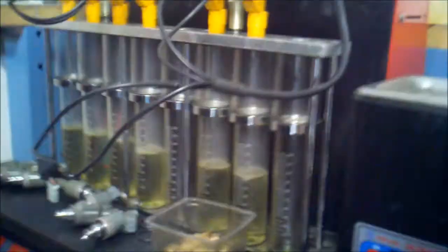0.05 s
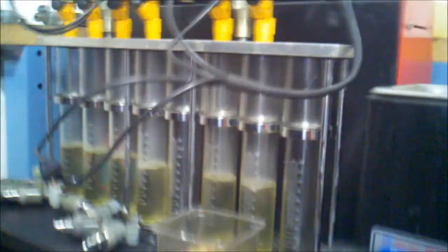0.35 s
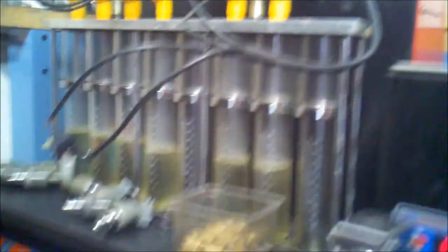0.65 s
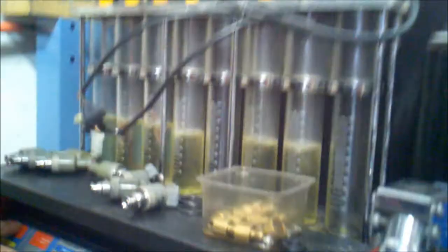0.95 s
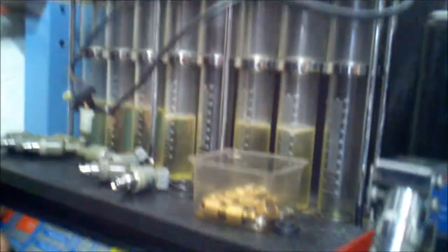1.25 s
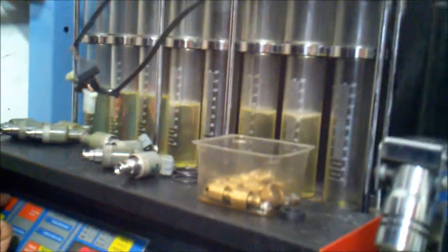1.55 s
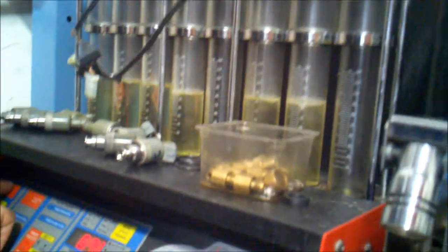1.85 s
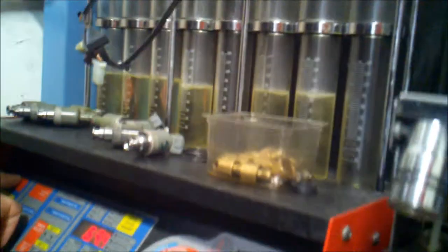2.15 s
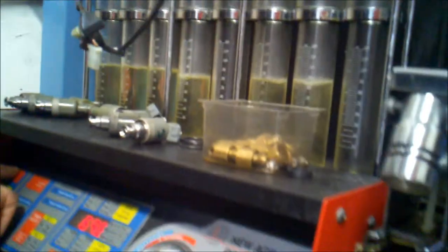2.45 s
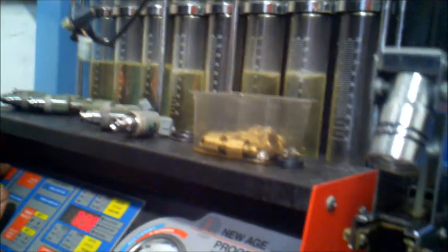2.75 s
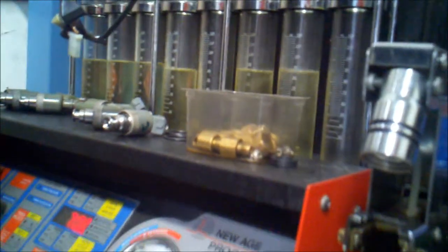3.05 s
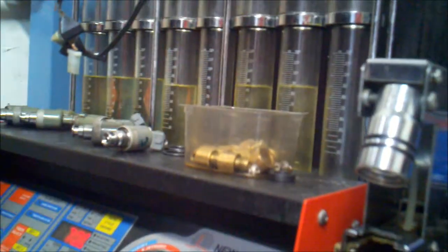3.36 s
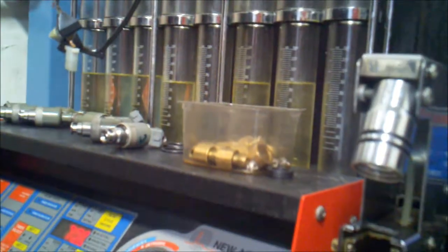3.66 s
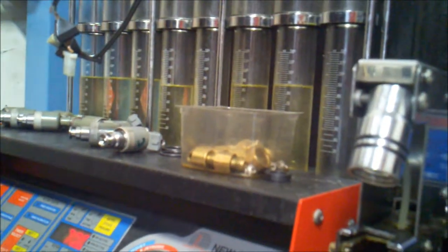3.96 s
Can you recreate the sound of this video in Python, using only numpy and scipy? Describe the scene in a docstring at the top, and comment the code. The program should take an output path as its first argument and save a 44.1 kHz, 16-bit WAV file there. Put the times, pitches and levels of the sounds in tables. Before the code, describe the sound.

A bright, hissing buzz comes from fuel injectors spraying on a workshop test bench, heard close up, with a pump whining and a couple of soft knocks. The buzz stops abruptly, and the pump fades just after, leaving faint background noise.

```python
"""A bright, hissing buzz comes first: fuel injectors on a test bench tick and spray 120 times a second.
The spinning fuel pump whines and beats against the buzz, and a few soft knocks come and go.
Near 2.8 s the injectors cut out; the pump runs on for a moment and dies away, leaving the workshop's
background. A hand-held pair of microphones moves slowly, so the tone of the buzz keeps shifting."""
import sys
import numpy as np
from scipy import signal
from scipy.fft import rfft, irfft
from scipy.io import wavfile
from scipy.ndimage import uniform_filter1d, map_coordinates

SR = 44100
rng = np.random.default_rng(int(sys.argv[2]) if len(sys.argv) > 2 else 0)


def wav_out(sig):
    """Save sig, one row per channel (or a flat mono array), as 16-bit PCM at SR to the path in sys.argv[1]."""
    wavfile.write(sys.argv[1], SR, np.round(np.clip(np.atleast_2d(sig).T, -1, 1) * 32767).astype(np.int16))


N = 176400
TIME = np.arange(N) / SR

INJECTOR_HZ, INJECTORS_OFF_S = 119.88, 2.815
CONTACT_RING_MS, CONTACT_WIDTH_OCTAVES = 1.45, 0.86
MIDWAY_S = 1.4  # the tone tables give their levels at this moment
MIC_DELAY_S, SECOND_MIC_NOISE_DB = .000385, -1.5

# strong tones of the buzz:
# (multiple of the tick rate, level [dB], change as the microphones move [dB/s], left over right [dB])
BUZZ_TONES = [(1, -52, 0, 1), (2, -37.5, 0, -1), (4, -43, -1, 3), (5, -38.3, -1.3, -1), (6, -45.5, 2.5, 4),
              (7, -34, 2, 0), (8, -45.5, -6, 0), (10, -53, 2, 0), (11, -46, -1.5, 0), (12, -47, -1, 0),
              (14, -40, 2, -3), (15, -39.5, .5, -3), (16, -43, -1.5, -2), (17, -42, .3, -2),
              (18, -45, 0, 0), (20, -38.5, -2, -2), (21, -37.5, 1, 0), (22, -47, -1, 0), (23, -46, -3, 0),
              (26, -44.5, 0, 0), (33, -40.5, 1.3, 0), (34, -44.5, .7, 0), (36, -41.5, 1.3, 0),
              (37, -46, 1.3, -2), (39, -45.5, 2, 0), (45, -44, 0, 0), (74, -45, -2, 0),
              (77, -47.5, -2.5, 0), (96, -45, 1, 0), (98, -47, -.5, 0)]
# how the buzz swells and dips: (time [s], gain [dB])
BUZZ_SWELL = [(0, 2), (.5, 3), (1.2, 2.5), (2.0, 0.5), (2.5, 2.5), (2.8, 2.5)]
# hits of the injector needles in each cycle: (time [ms], relative level [dB], centre of the ring [Hz])
NEEDLE_CONTACTS = [(5.9, -1.5, 3300), (7.0, 1, 9100), (.7, 1.5, 6200), (4.2, 2, 8700), (5.2, -5.5, 7200)]
# tone colour of the ticking: (frequency [Hz], level of each overtone [dB])
TICK_COLOUR = [(900, -70), (1600, -64), (2200, -76), (3100, -48.5), (4300, -50), (5400, -46.5), (7000, -48),
               (8100, -52.5), (9000, -51.5), (12400, -46), (13400, -55)]
# hiss of the spray: (frequency [Hz], level [dB per Hz])
SPRAY_COLOUR = [(70, -112), (300, -89), (1500, -84), (3000, -80.5), (4800, -72.5), (7000, -74.5),
                (9500, -72), (12300, -77.5), (14000, -78)]
# how ticking and spray swell and dip together: (time [s], gain [dB])
TREBLE_SWELL = [(0, 7), (.4, 3), (.85, 0.7), (1.2, 0), (1.8, -3.3), (2.25, -1), (2.55, 4.5), (2.8, 2.5)]
# extra boost or cut for their highest part: (time [s], gain [dB])
TOP_SWELL = [(0, -9.5), (.2, -8.5), (.38, -1.8), (.7, -1), (.92, -0.2), (1.3, 1.5), (1.7, 3.5), (2.05, 2.7),
             (2.35, -0.5), (2.55, -6.5), (2.8, -4.5)]
# echoes off the bench: (delay [ms], change of delay along the microphones' path [ms], level [dB])
BENCH_ECHOES = [(.415, -.29, -15), (.18, -.14, -15), (.74, -.25, -16), (.675, .03, -18), (.97, .19, -18)]
# movement of the microphones: (time [s], share of the path covered [0 to 1])
MIC_TRAVEL = [(0, 0), (.4, .3), (1.2, .62), (2.8, 1)]
# how fast the pump runs: (time [s], base rate of its whine, half the shaft's turns per second [Hz])
PUMP_SPIN = [(0, 49.23), (.93, 49.23), (1.07, 49.72), (1.2, 49.23), (2.8, 49.23), (3.05, 49.05),
             (3.3, 48.4)]
# tones of the pump's whine: # (multiple of that base rate, level [dB], change as the microphones move [dB/s],
# left over right [dB])
WHINE_TONES = [(4, -56, 0, 0), (5, -39.5, .3, 2), (10, -32.5, .6, 3), (12, -43, 1.2, 2), (15, -49, 1, 0),
               (20, -52, .5, 0), (30, -49, 1, 0), (34, -46, 4.5, -2), (39, -51, 3, -2)]
# how the whine swells and dips: (time [s], gain [dB])
WHINE_SWELL = [(0, 1), (.3, 3.5), (.8, -3.5), (1.6, 0.1), (2.5, 0), (2.8, 2), (3.05, 3)]
# whirr of the pump: (frequency [Hz], level [dB per Hz])
WHIRR_COLOUR = [(30, -104), (60, -104), (100, -72), (140, -67.5), (240, -64.5), (340, -71), (470, -59.5),
                (560, -64.5), (950, -67), (1150, -70), (1320, -72.5), (1420, -57), (1550, -71),
                (1670, -59.5), (1780, -61), (1900, -63.5), (2150, -60), (2600, -75.5), (3600, -72.5),
                (5000, -86), (14000, -105)]
# hiss of flowing fuel: (frequency [Hz], level [dB per Hz])
FLOW_COLOUR = [(1000, -103), (3000, -74.5), (4000, -81.5), (4900, -83), (6500, -79), (9000, -78),
               (12000, -78.5), (14000, -78.5)]
# room noise: (frequency [Hz], level [dB per Hz])
ROOM_COLOUR = [(25, -100), (70, -86), (200, -78.5), (330, -77), (470, -88.5), (620, -76), (850, -92),
               (1500, -89.5), (3600, -89), (5200, -100), (8000, -94.5), (12500, -91.5), (14000, -97)]
# how the room noise swells and dips: (time [s], gain [dB])
ROOM_SWELL = [(3.3, 1), (3.45, -0.5), (3.55, -1.5), (3.65, -1.5), (3.75, -3), (3.9, 0.5)]
# mid-pitched rush of distant work: (frequency [Hz], level [dB per Hz])
FAR_WORK_COLOUR = [(300, -111), (800, -83), (1080, -78), (1250, -79), (1420, -74), (1560, -85),
                   (1900, -77.5), (2550, -77.5), (2900, -80.5), (3400, -86), (5000, -93), (14000, -99)]
# how that rush swells and dips: (time [s], gain [dB])
FAR_WORK_SWELL = [(3.3, -6), (3.45, -3), (3.55, -7), (3.63, -1), (3.7, -5), (3.77, -1), (3.81, -2),
                  (3.87, 1), (3.93, 0), (3.98, 1)]
# bumps and scuffs: (time [s], level [dB per Hz], pitch [Hz], width [octaves], decay time [s])
SOFT_KNOCKS = [(.896, -50.5, 418, 1.56, 0.012), (1.172, -55, 720, .3, .025), (3.238, -69, 1070, .15, 0.016),
               (3.272, -69, 1070, 0.15, .02), (3.452, -69, 250, .6, 0.025), (3.468, -75, 797, .2, .015),
               (3.725, -78.5, 3300, 0.13, 0.18), (3.865, -71.5, 230, 0.64, .06)]


def from_db(db):
    """Turns decibels into a number to multiply a sound by."""
    return 10 ** (np.asarray(db) / 20)


def in_time(rows):
    """Joins (time, value) points with straight lines, giving a value for every sample."""
    return np.interp(TIME, *np.transpose(rows))


def colour_gain(colour, hz):
    """Reads the gain at each frequency from a table of (frequency, level) points."""
    table_hz, db = np.transpose(colour)
    return from_db(np.interp(np.log(np.maximum(hz, 1)), np.log(table_hz), db))


def drift(rate_hz):
    """A smooth random wobble, typically about 1 in size; a higher rate wobbles faster."""
    step, warm_up = 100, 1000  # one random value every 100 samples
    memory = np.exp(-2 * np.pi * rate_hz * step / SR)
    white = rng.standard_normal(N // step + warm_up + 2)
    slow = signal.lfilter([1], [1, -2 * memory, memory ** 2], white)[warm_up:]
    return np.interp(np.arange(N) / step, np.arange(len(slow)), (slow - slow.mean()) / slow.std())


def running(off_s, fade_db_per_s):
    """Full level until the switch-off time, then a steady fade."""
    return from_db(-fade_db_per_s * np.maximum(TIME - off_s, 0))


def part_above(sound, hz):
    """Keeps the part of a sound above a frequency."""
    return signal.sosfiltfilt(signal.butter(4, hz, "high", fs=SR, output="sos"), sound)


def mic_shares(second_db):
    """Shares a sound between the two microphones, with the second at second_db against the first."""
    gains = np.array([[1], [from_db(second_db)]])
    return gains / np.linalg.norm(gains)


def noise(colour, white=None):
    """Shapes white noise (fresh, unless given) into a tone colour at both microphones."""
    if white is None:
        white = rng.standard_normal((2, N))
    gain = colour_gain(colour, np.fft.rfftfreq(N, 1 / SR)) * np.sqrt(SR / 2)
    return mic_shares(SECOND_MIC_NOISE_DB) * irfft(rfft(white) * gain, N)


def stereo(mics):
    """Left and right: sum and difference of the microphones in the bass, each minus the delayed other above."""
    hz = np.fft.rfftfreq(N, 1 / SR)
    first, second = rfft(mics)
    delay = np.exp(-2j * np.pi * hz * MIC_DELAY_S)
    blend = np.clip(4 * hz * MIC_DELAY_S - 1, 0, 1)  # rises from 0 to 1 through the middle pitches
    lows = (1 - blend) * np.array([first + second, first - second]) + blend * (first + second)
    highs = [first - delay * second, second - delay * first]
    return irfft(np.where(blend < 1, lows, highs), N)


def tones(cycles, rate_hz, table, waver_db):
    """Anything that repeats makes pure tones at multiples of its rate; here each wavers in level."""
    out = np.zeros((2, N))
    for row, (multiple, db, db_per_s, pan_db) in enumerate(table):
        phase = 2 * np.pi * multiple * cycles + row ** 2  # each tone starts at a different phase
        right_lag = np.pi * max(2 * multiple * rate_hz * MIC_DELAY_S - 1, 0)
        waver = waver_db * (.8 * drift(1.5) + .6 * drift(14))
        level = from_db(db + db_per_s * (TIME - MIDWAY_S) + waver)
        pan = from_db([[pan_db / 2], [-pan_db / 2]])
        out += level * pan * np.sin([phase, phase - right_lag])
    return out


def needle_contacts(seconds):
    """Each hit of a needle sets off a short ring around its own pitch; returns their joint spectrum."""
    hz = np.maximum(np.fft.rfftfreq(len(seconds), seconds[1]), 1)
    out = 0
    for ms, db, centre_hz in NEEDLE_CONTACTS:
        age_ms = 1000 * ((seconds - ms / 1000) % (1 / INJECTOR_HZ))
        burst = rng.standard_normal((2, len(seconds))) * np.exp(-age_ms / CONTACT_RING_MS)
        out += rfft(burst) * from_db(db) / (1 + (np.log2(hz / centre_hz) / CONTACT_WIDTH_OCTAVES) ** 2)
    return out


def ticking(cycle_samples=2048, places=5, change=.45):
    """The same ring repeats every cycle, changing a little as the microphones pass from place to place."""
    cycle_s = np.arange(cycle_samples) / cycle_samples / INJECTOR_HZ
    overtone_hz = np.arange(cycle_samples // 2 + 1) * INJECTOR_HZ
    level = colour_gain(TICK_COLOUR, overtone_hz) * cycle_samples / np.sqrt(2)
    level[[0] + [round(row[0]) for row in BUZZ_TONES]] = 0  # leave gaps for the buzz's tones
    level[overtone_hz > 14100] = 0
    shared_ring, out = needle_contacts(cycle_s), 0
    for place in np.eye(places):
        phase = np.angle(shared_ring + change * needle_contacts(cycle_s))
        one_cycle = irfft(level * np.exp(1j * phase))
        repeated = np.array([np.interp(TIME, cycle_s, mic, period=1 / INJECTOR_HZ) for mic in one_cycle])
        nearness = np.interp(TIME, np.linspace(0, INJECTORS_OFF_S, places), place)
        out += nearness * repeated
    return mic_shares(second_db=-16) * out


def spray():
    """Spraying fuel hisses in pulses that follow the needle hits."""
    bursts = needle_contacts(TIME)
    smooth_power = uniform_filter1d(abs(bursts) ** 2, size=801)
    white = irfft(bursts / np.sqrt(smooth_power), N)  # even out the colour but keep the pulses
    return noise(SPRAY_COLOUR, white / white.std())


def with_bench_echoes(sound):
    """Short echoes shift as the microphones move, so peaks and dips wander through the treble."""
    travel, out = in_time(MIC_TRAVEL), sound
    for ms, change_ms, db in BENCH_ECHOES:
        source_s = TIME - (ms + change_ms * travel) / 1000
        echo = np.array([map_coordinates(mic, [source_s * SR], order=3) for mic in sound])
        out = out + from_db(db) * echo
    return out


def injectors():
    """Buzz, ticking and spray, which cut out together; the brightness shifts as the microphones move."""
    buzz = tones(INJECTOR_HZ * TIME, INJECTOR_HZ, BUZZ_TONES, waver_db=1) * from_db(in_time(BUZZ_SWELL))
    treble = stereo(with_bench_echoes(ticking() + spray())) * from_db(in_time(TREBLE_SWELL))
    treble += part_above(treble, hz=3400) * (from_db(in_time(TOP_SWELL)) - 1)
    return (buzz + treble) * running(INJECTORS_OFF_S, fade_db_per_s=344)


def pump():
    """The spinning pump makes a whine, a whirr that throbs once a turn, and a hiss of flowing fuel."""
    speed = in_time(PUMP_SPIN)
    half_turns = np.cumsum(speed) / SR
    whine = tones(half_turns, speed.mean(), WHINE_TONES, waver_db=.9) * from_db(in_time(WHINE_SWELL))
    whine *= running(off_s=3.077, fade_db_per_s=162)
    throb = 1 + .13 * np.cos(2 * np.pi * 2 * half_turns)
    flicker = from_db(.34 * drift(19))
    whirr = throb * flicker * stereo(noise(WHIRR_COLOUR))
    rasp = part_above(whirr, hz=1100)  # the upper part of the whirr stops first
    low_whirr = (whirr - rasp) * running(off_s=3.153, fade_db_per_s=113)
    rasp *= running(off_s=3.11, fade_db_per_s=125)
    flow = stereo(noise(FLOW_COLOUR)) * running(off_s=3.14, fade_db_per_s=225)
    return whine + low_whirr + rasp + flow


def workshop():
    """Room noise and a rush of distant work, there all along and uneven near the end."""
    room = noise(ROOM_COLOUR) * from_db(in_time(ROOM_SWELL))
    far_work = noise(FAR_WORK_COLOUR) * from_db(in_time(FAR_WORK_SWELL))
    return stereo(room + far_work)


def knocks():
    """Soft bumps and scuffs: each is a fading burst of noise that rings around its own pitch."""
    hz = np.maximum(np.fft.rfftfreq(N, 1 / SR), 1)
    white, spectrum = rng.standard_normal((2, N)), 0
    for start_s, db, pitch_hz, octaves, decay_s in SOFT_KNOCKS:
        burst = white * (TIME >= start_s) * np.exp(-abs(TIME - start_s) / decay_s)
        spectrum += rfft(burst) * from_db(db) / (1 + (np.log2(hz / pitch_hz) / octaves) ** 2)
    return stereo(mic_shares(SECOND_MIC_NOISE_DB) * irfft(spectrum, N) * np.sqrt(SR / 2))


def scene():
    """The test bench and the workshop around it, added together."""
    return injectors() + pump() + knocks() + workshop()


def record(dry, low_cut_hz=67, high_cut_hz=14100):
    """Softens the deepest bass and sharply cuts the highest treble."""
    thinned = signal.sosfilt(signal.butter(2, low_cut_hz, "high", fs=SR, output="sos"), dry)
    return signal.sosfilt(signal.ellip(12, .1, 80, high_cut_hz, fs=SR, output="sos"), thinned)


dry = scene()
out = record(dry)
wav_out(out)
```